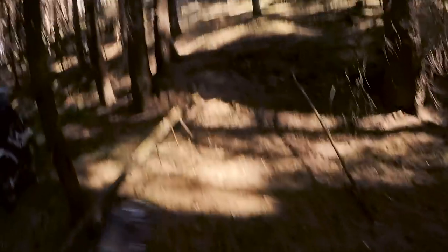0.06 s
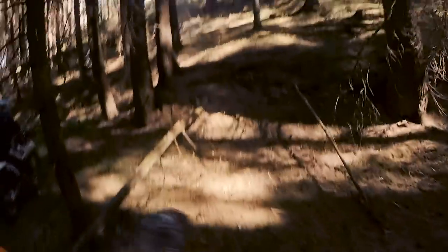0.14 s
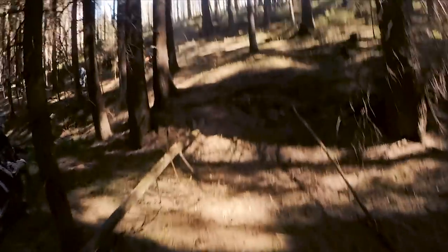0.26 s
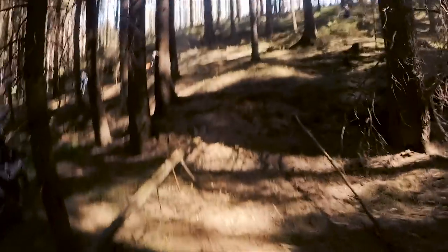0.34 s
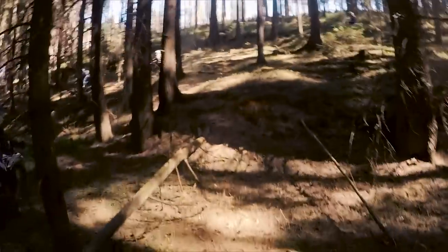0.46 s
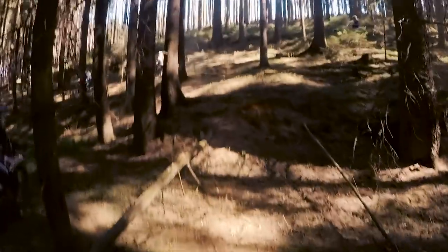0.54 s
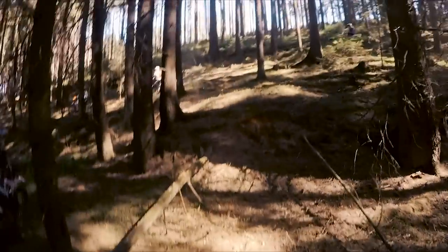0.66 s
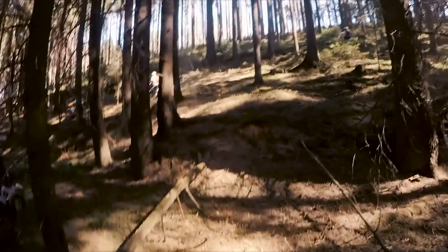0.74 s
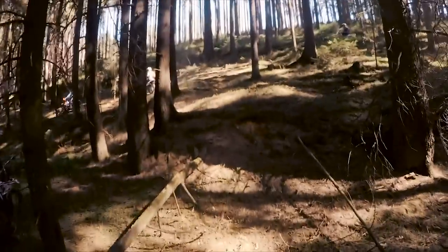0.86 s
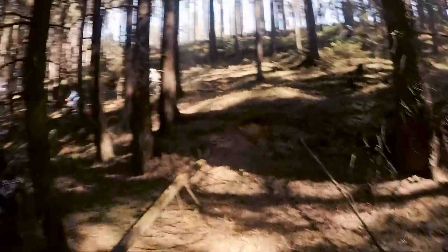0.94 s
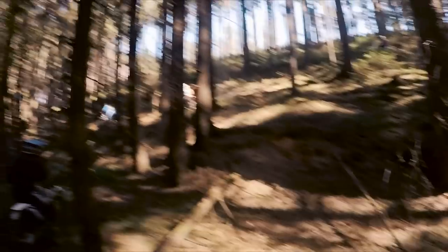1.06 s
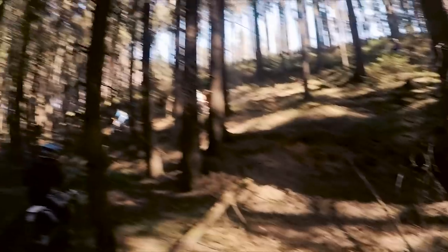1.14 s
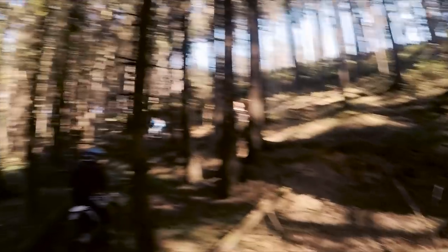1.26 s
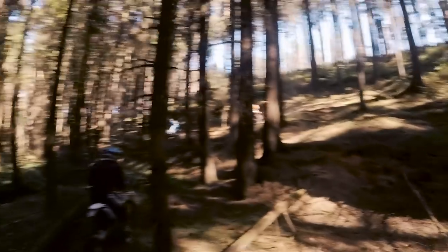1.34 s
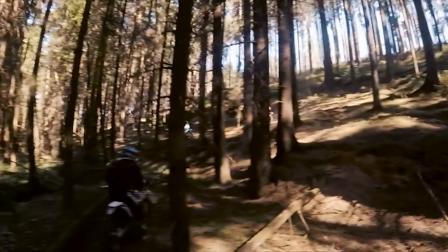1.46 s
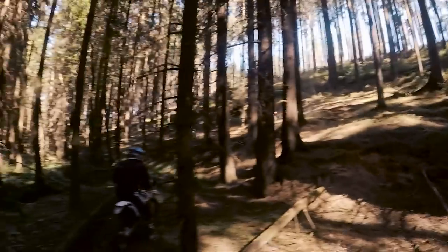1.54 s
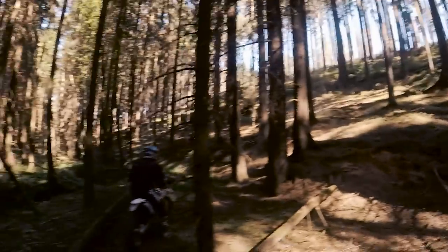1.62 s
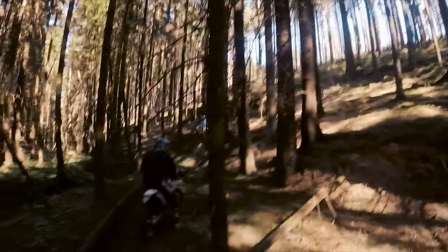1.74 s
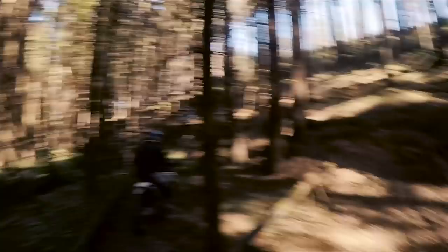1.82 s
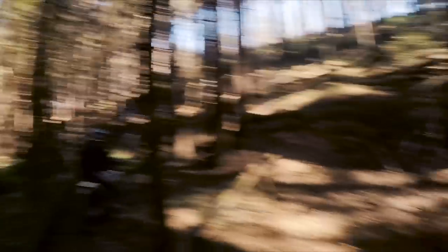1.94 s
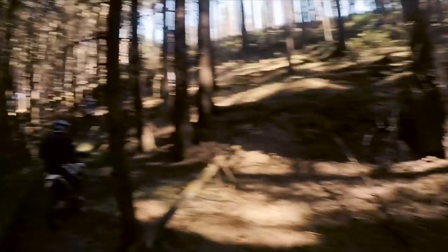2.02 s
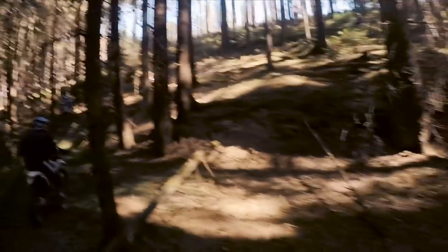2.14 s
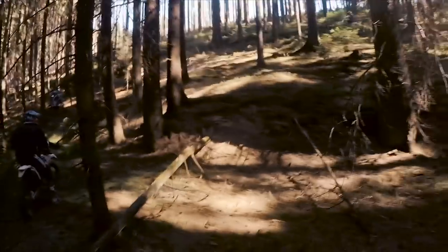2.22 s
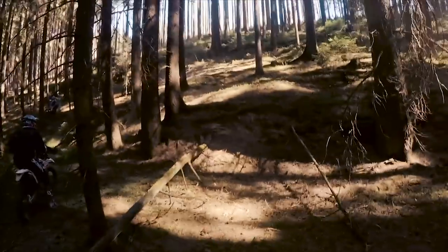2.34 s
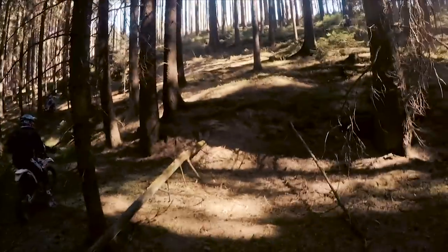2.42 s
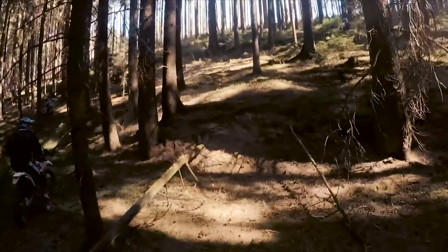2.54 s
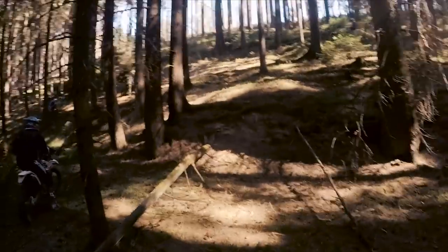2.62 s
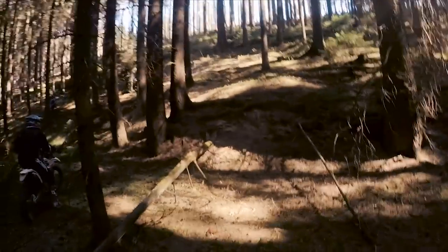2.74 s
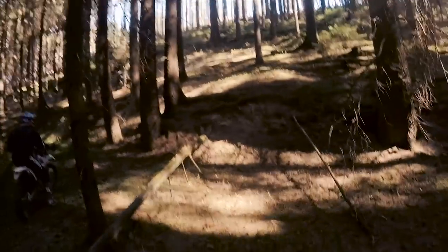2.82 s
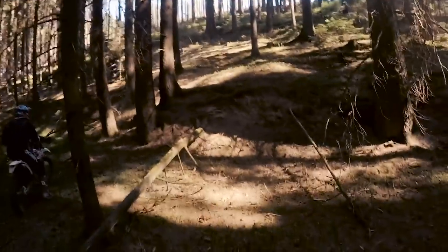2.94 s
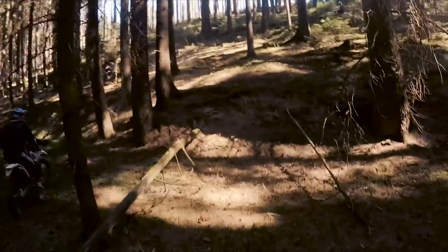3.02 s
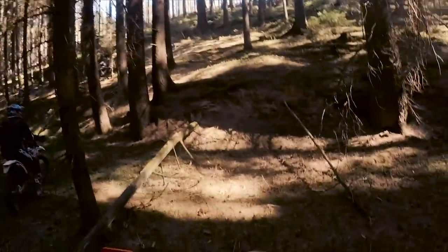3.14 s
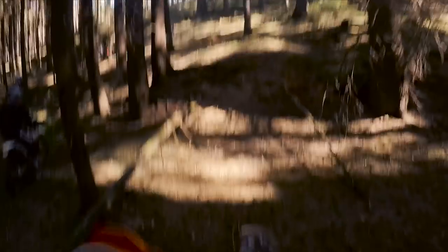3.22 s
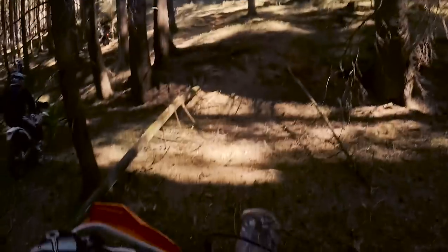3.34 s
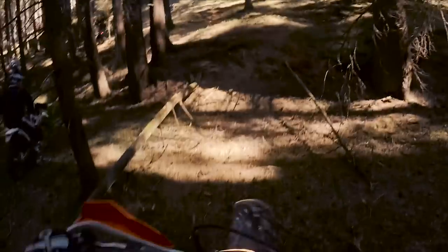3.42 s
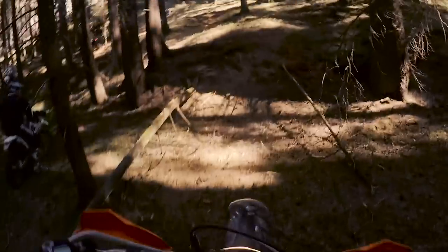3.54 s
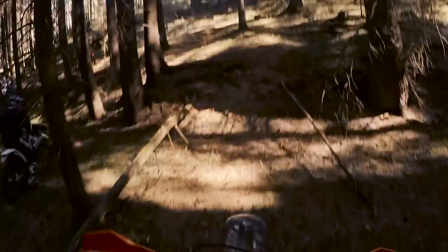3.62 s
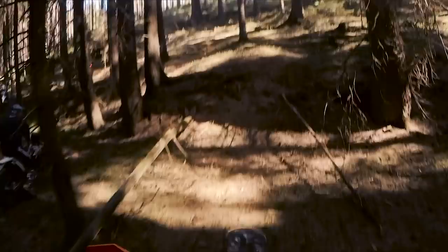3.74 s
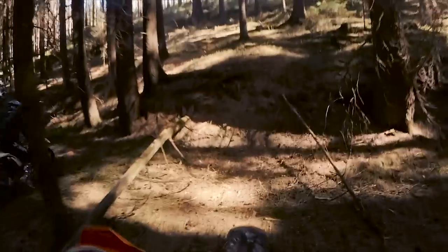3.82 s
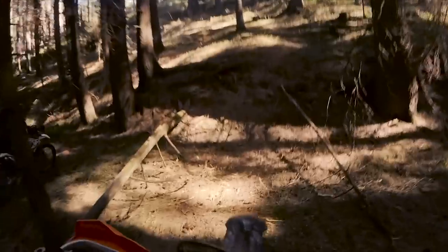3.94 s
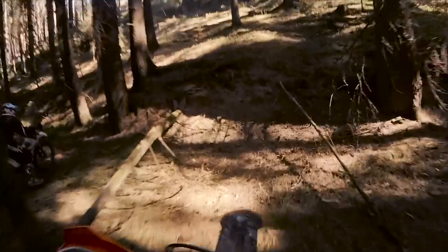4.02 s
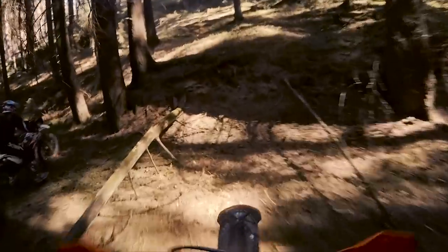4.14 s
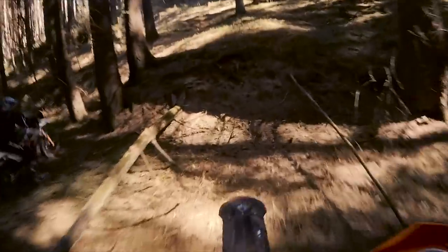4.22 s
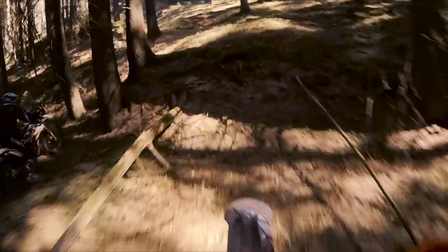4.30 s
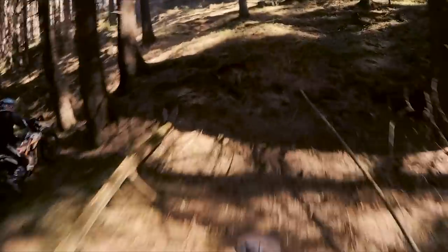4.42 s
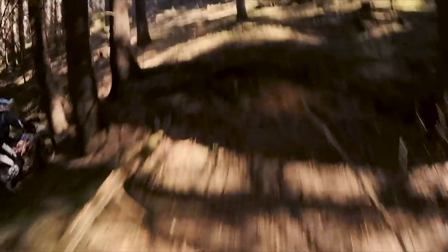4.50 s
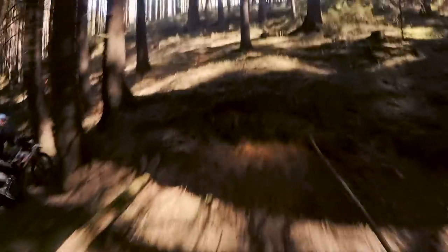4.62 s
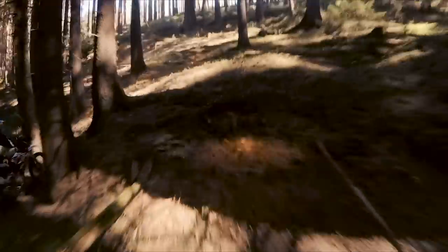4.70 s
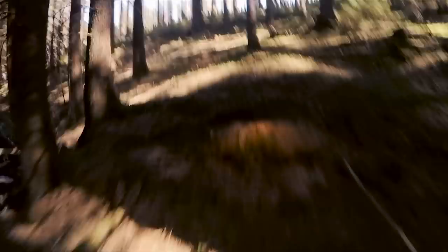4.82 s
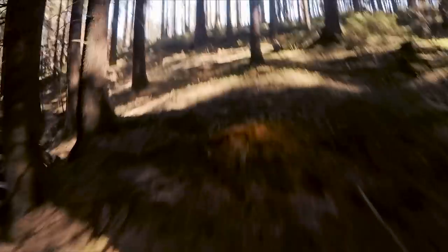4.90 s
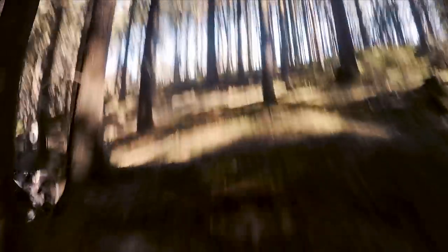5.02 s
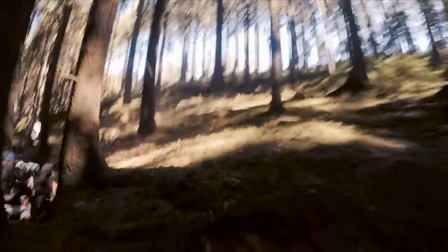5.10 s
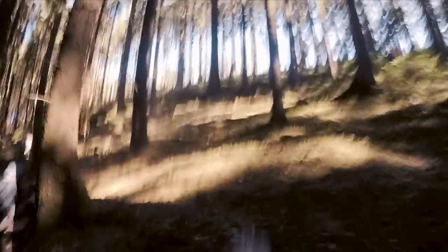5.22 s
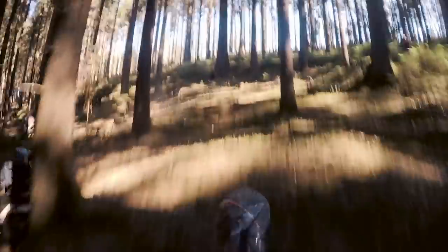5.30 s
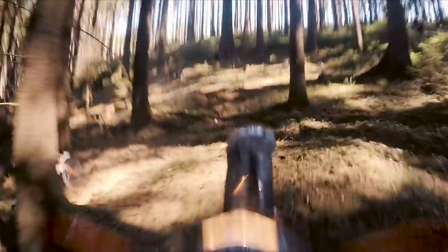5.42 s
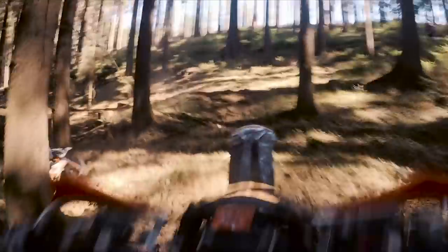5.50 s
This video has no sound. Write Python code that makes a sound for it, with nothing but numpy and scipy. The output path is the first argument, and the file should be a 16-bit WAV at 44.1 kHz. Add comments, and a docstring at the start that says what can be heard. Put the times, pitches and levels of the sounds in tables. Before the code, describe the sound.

Close onboard two-stroke motorbike: falling revs, quiet uneven putter, snarling throttle bursts, a bump, then a high ringing pull through forest.

```python
"""On a forest trail, a two-stroke enduro bike slows to a stumbling idle, is revved in bursts and pulls away.
One crankshaft times the engine: each turn sends a pulse through filters for the exhaust boom and bark,
the airbox and duct honk, the metal clatter and ringing, and a gritty sizzle.
Shaped noise makes the tyres, rattles, gas rushes and low background; the trees return a thin echo."""
import sys
import numpy as np
from scipy import signal
from scipy.fft import rfft, irfft, next_fast_len
from scipy.io import wavfile
from scipy.ndimage import uniform_filter1d

SR = 44100
rng = np.random.default_rng(int(sys.argv[2]) if len(sys.argv) > 2 else 0)


def generate_wav(signal):
    """Clip the signal to [-1, 1] and save it as 16-bit WAV at the path in sys.argv[1]."""
    frames = np.transpose(np.atleast_2d(signal))
    scaled = np.clip(frames, -1, 1) * 32767
    pcm = np.round(scaled).astype(np.int16)
    wavfile.write(sys.argv[1], SR, pcm)


N = 245195   # samples, about 5.6 s
TIME = np.arange(N) / SR   # s


def from_db(db):
    """Decibels to gain."""
    return 10 ** (np.asarray(db) / 20)


def rms_one(x):
    """Scale to an average power of one."""
    return x / np.sqrt(np.mean(x ** 2) + 1e-20)


def steady(x):
    """Hold the power near one, averaged over about a tenth of a second."""
    power = uniform_filter1d(uniform_filter1d(x ** 2, size=2600), size=2000)
    return x / np.sqrt(np.maximum(power, 1e-14))


def noise():
    """White noise: every pitch at once, equally strong."""
    return rng.standard_normal(N)


def band(x, low_hz, high_hz):
    """Keep the pitches between two limits."""
    sections = signal.butter(2, [low_hz, min(high_hz, .45 * SR)], "band", fs=SR, output="sos")
    return signal.sosfilt(sections, x + 1e-18)


def coloured(x, spectrum):
    """Shape the tone to a drawn spectrum, with a filter that never sounds early (minimum phase)."""
    size = next_fast_len(N + SR // 4) * 2
    hz, db = np.transpose(spectrum)
    grid_hz = np.maximum(np.arange(size // 2 + 1) * SR / size, 1)
    gain = from_db(np.interp(np.log(grid_hz), np.log(hz), db))
    # folding the cepstrum forward in time gives the minimum phase
    cepstrum = irfft(np.log(gain))
    cepstrum[1:size // 2] *= 2
    cepstrum[size // 2 + 1:] = 0
    return irfft(rfft(x, size) * np.exp(rfft(cepstrum)))[:N]


def resonate(x, modes):
    """Ring several resonances side by side, each with its own pitch, width and level."""
    out = 0
    for hz, width_hz, db in modes:
        r = np.exp(-np.pi * width_hz / SR)
        poles = [1, -2 * r * np.cos(2 * np.pi * hz / SR), r * r]
        ringing = signal.lfilter([1, 0, -1], poles, x + 1e-18)
        out = out + from_db(db) * (1 - r * r) / 2 * ringing
    return out


def impulses(times, sizes):
    """Clicks shared between the two nearest samples, so they can fall in between."""
    out, at = np.zeros(N + 2), np.clip(np.asarray(times) * SR, 0, N)
    np.add.at(out, at.astype(int), sizes * (1 - at % 1))
    np.add.at(out, at.astype(int) + 1, sizes * (at % 1))
    return out[:N]


def dying(clicks, decay_s):
    """Each click starts an exponential fade of its own height."""
    return signal.lfilter([1], [1, -np.exp(-1 / (decay_s * SR))], clicks + 1e-18)


def puffs(pulses, decay_s, between):
    """Rushing gas or grit: noise that flares with each pulse and lingers between them."""
    return steady(noise() * (steady(dying(pulses, decay_s)) + between))


def gate(start_s, end_s, attack_s, release_s):
    """Rises from the start, holds at one, falls after the end."""
    return np.clip((TIME - start_s) / attack_s, 0, 1) * np.clip(1 - (TIME - end_s) / release_s, 0, 1)


def spells(rows, attack_s, release_s):
    """Gain that rises to each row's level from its start to its end."""
    return sum(from_db(db) * gate(start, end, attack_s, release_s) for start, end, db in rows)


# low background, tone curve: pitch_hz, level_db
BACKGROUND_TONE = [(13, -18), (22, 0), (107, -1.5), (195, -14), (347, -6.5), (431, -11.5), (615, -10),
                   (830, -15), (1430, -20), (4390, -32), (15000, -37)]


def background():
    """Steady noise with most of its strength in the lowest pitches."""
    return from_db(-50) * rms_one(coloured(noise(), BACKGROUND_TONE))


def forest(x):
    """Tree trunks scatter a thin, dull tail of echoes."""
    t60_s, wet_db = .3, -19   # time to fade by 60 dB; level before the tone filter
    t = TIME[:SR // 2]
    sparse = rng.standard_normal(len(t)) * (rng.random(len(t)) < .03)
    echoes = sparse * from_db(-60 * t / t60_s) * (t > .012)
    tail = signal.fftconvolve(x, echoes / np.sqrt(np.sum(echoes ** 2)))[:N]
    return from_db(wet_db) * band(tail, 500, 5000)


def rustle(start_s, end_s, level_db):
    """A soft, high rustle swells just before the throttle opens, then stops."""
    swell = np.clip((TIME - start_s) / (end_s - start_s), 0, None) ** .5 * (TIME < end_s)
    return from_db(level_db) * swell * rms_one(band(noise(), 2100, 8200))


# wheels over roots and dry litter: start_s, end_s, thud_db, crunch_db
BUMPS = [(0.857, 0.98, -38, -53), (2.068, 2.298, -49.5, -55.5), (2.327, 2.613, -57, -62.5),
         (4.25, 4.503, -27.5, -36)]


def tyres():
    """Low noise thuds and sparse noise grains crunch as the wheels roll over the forest floor."""
    spans = np.array([gate(start, end, attack_s=0.035, release_s=0.054) for start, end, *_ in BUMPS])
    thud, crunch = from_db(np.transpose(BUMPS)[2:]) @ spans
    grains = noise() * (rng.random(N) < 2500 / SR)   # about 2500 a second
    thud_noise = rms_one(band(noise(), low_hz=65, high_hz=255))
    return thud * thud_noise + crunch * rms_one(band(grains, low_hz=1090, high_hz=2420))


# loose parts on the chassis: start_s, level_db (before trim and filter)
RATTLES = [(0.2944, -40), (0.9068, -40), (3.282, -23.5), (3.3217, -22.5), (3.3335, -41), (3.3776, -28),
           (4.334, -32.5)]
# small clicks of the controls: start_s, level_db (before boost and ringing)
CLICKS = [(1.947, -40)]
# ringing of a click: pitch_hz, width_hz, level_db
CLICK_RINGING = [(2300, 200, 4), (2740, 190, 10), (4900, 380, 1), (5530, 370, -19)]


def rattles():
    """Loose parts buzz in short noise bursts; a lever's click rings briefly."""
    s, db = np.transpose(RATTLES)
    buzz = band(noise(), 1900, 17000) * dying(impulses(s, from_db(db - 1.5)), decay_s=0.01)
    s, db = np.transpose(CLICKS)
    burst = noise() * dying(impulses(s, from_db(db + 8)), decay_s=.002)
    return buzz + resonate(burst, CLICK_RINGING)


def frame_rumble(speed):
    """The frame shakes harder with engine speed, heard as low noise."""
    return from_db(-42) * speed / speed.max() * rms_one(band(noise(), 24, 140))


# crankshaft speed: time_s, speed_turns_per_s
CRANK_SPEED = [(0.0, 89.2), (0.15, 79.2), (0.39, 64.7), (0.6, 56.0), (0.8, 51.0), (1.1, 43.2), (1.55, 31.6),
               (2.85, 30.1), (2.97, 48.2), (3.02, 53.0), (3.15, 79.0), (3.2, 91.2), (3.26, 103.8),
               (3.32, 107.0), (3.474, 74.6), (3.53, 77.0), (3.67, 92.2), (3.782, 98.5), (3.89, 91.8),
               (3.97, 97.2), (4.068, 105.5), (4.21, 105.3), (4.3, 80.2), (4.4, 51.5), (4.47, 55.8),
               (4.53, 70.2), (4.58, 76.8), (4.645, 81.0), (4.696, 99.2), (4.74, 108.2), (4.8, 117.8),
               (4.85, 131.2), (4.905, 138.6), (4.96, 121.2), (5.09, 129.0), (5.14, 124.0), (5.2, 124.0),
               (5.32, 103.9), (5.45, 96.2), (5.56, 89.9)]
# twists of the throttle: start_s, end_s, twist_s, added_opening (0-1), added_unevenness (0-1, sign ignored
# after summing), exhaust_bark_db, duct_honk_db
BLIPS = [(2.93, 3.3, 0.16, 0.2, 0.09, 1.5, -3.5), (3.446, 3.77, 0.016, 0.22, 0.12, 0, 1.5),
         (3.783, 4.194, 0.32, 0.36, 0.04, -1, -0.5), (4.364, 4.89, 0.036, 0.39, 0.01, 1.5, -1)]
# clutch engaged: start_s, end_s
IN_GEAR = [(-.5, 1.117), (4.781, 6.0)]
# engine runs free and stumbles: start_s, end_s
STUMBLES = [(1.1, 2.94), (3.3, 3.45), (3.785, 3.875), (4.215, 4.365)]
KNEE_SPEED = 96.15   # turns per s; above it loudness follows a second slope


def riding():
    """The rider's controls and what they do to the engine: speed, load, tone and how evenly it fires."""
    speed = np.interp(TIME, *np.transpose(CRANK_SPEED))
    held = gate(2.86, 5.24, attack_s=.19, release_s=.075)   # throttle held part open
    twists = np.array([gate(start, end, twist_s, release_s=0.046) for start, end, twist_s, *_ in BLIPS])
    more, rough, bark_db, duct_db = np.transpose(BLIPS)[3:] @ twists
    in_gear = sum(gate(start, end, attack_s=0.16, release_s=0.03) for start, end in IN_GEAR)
    free = sum(gate(start, end, attack_s=.02, release_s=.025) for start, end in STUMBLES)
    return dict(
        speed=speed,
        doublings=np.log2(speed / KNEE_SPEED),
        throttle=.46 * held + more,
        in_gear=in_gear,
        # always a little uneven, more with the throttle shut, most while running free
        uneven=.05 + np.abs(rough) + .13 * (1 - held) + .42 * free,
        skip=.3 * free * held,   # weakening of every second firing (0-1)
        bark_db=bark_db,
        duct_db=duct_db - 1.5 * free)


def surge():
    """A slow random swing of spread one, between 3 and 14 Hz."""
    step = 100   # samples between slow values
    sections = signal.butter(2, [3, 14], "band", fs=SR / step, output="sos")
    slow = rms_one(signal.sosfilt(sections, rng.standard_normal(N // step + 2)))
    return np.interp(np.arange(N) / step, np.arange(len(slow)), slow)


def loudness(law, ride):
    """Gain of one engine part from speed, throttle and clutch; it surges more when firing is uneven."""
    knee_db, speed_db, above_db, throttle_db, gear_db = law
    speed_part = speed_db * ride["doublings"] + above_db * np.maximum(ride["doublings"], 0)
    load_part = throttle_db * ride["throttle"] + gear_db * ride["in_gear"]
    return from_db(knee_db + speed_part + load_part + 4.5 * ride["uneven"] * surge())


def firings(ride, jitter_s, spread_db, lag_turns=0):
    """One pulse a turn; uneven running varies strength and timing, and every second one may weaken."""
    turns = np.cumsum(ride["speed"]) / SR
    number = np.arange(int(turns[-1]) + 1)
    times = np.interp(number + lag_turns, turns, TIME)
    uneven = np.interp(times, TIME, ride["uneven"])
    skip = np.interp(times, TIME, ride["skip"])
    late, strong = np.clip(rng.standard_normal((len(times), 2)), -2, 2).T
    sizes = from_db(spread_db * uneven * strong) * (1 - skip * (number % 2))
    return impulses(times + jitter_s * uneven * late, sizes)


# round trips in the exhaust's expansion chamber: trip_s
PIPE_TRIPS = [.0011, .0019, .0031]


def scattered(x):
    """Reflections along the pipe smear each pulse and leave its spectrum whole."""
    for trip_s in PIPE_TRIPS:
        loop = np.r_[1, np.zeros(int(trip_s * SR) - 1), -.55]
        x = signal.lfilter(loop[::-1], loop, x)
    return x


# echoes off the ground and nearest trunks: delay_s, delay_change_s_per_s, level_db
NEAR_ECHOES = [(.0052, .00012, -7), (.0127, -.00025, -9), (.0209, .0003, -11)]


def bounced(x):
    """Near echoes shift as the rider moves, so overtones swell and fade in turn."""
    out = x
    for delay_s, change, db in NEAR_ECHOES:
        out = out + from_db(db) * np.interp(TIME - delay_s - change * TIME, TIME, x)
    return out


# whines and low drones: start_s, end_s, cycles_per_turn, level_db
WHINES = [(-.2, .25, 4, -30), (-.04, .26, 8, -27), (-.1, .14, 7, -33), (.16, .46, 7, -31),
          (.3, .42, 9, -38), (-.02, .22, 16, -31), (-.1, .2, 19, -37), (.33, .66, 2, -34.5),
          (.6, 1.2, 2, -39), (.18, .36, 13, -37), (.22, .32, 18, -35), (.26, .4, 15, -39),
          (.14, .26, 9, -33), (.36, 1.18, 7, -36.5), (.3, 1.18, 6, -38), (.7, 1.0, 4, -41),
          (.45, .8, 9, -41), (.5, .8, 12, -37), (.75, 1.13, 11, -41), (.88, 1.1, 13, -40),
          (1.2, 2.0, 4, -51), (5.2, 5.5, 2, -21), (5.3, 5.65, 5, -28), (5.33, 5.49, 13, -25),
          (5.3, 5.42, 15, -33), (5.45, 5.7, 11, -28)]


def whines_and_drones(speed):
    """Whines and low drones hum at whole multiples of the crank speed, swelling and fading."""
    angle = 2 * np.pi * np.cumsum(speed) / SR
    hum = 0
    for start, end, multiple, db in WHINES:
        swell = np.sin(np.pi * np.clip((TIME - start) / (end - start), 0, 1))
        hum = hum + from_db(db) * swell * np.sin(round(multiple) * angle)
    waver = 1 + .35 * rms_one(band(noise(), 8, 90))
    return waver * hum


def knock(strokes):
    """As the engine runs down in gear, one sharp piston knock a turn stands out."""
    sharp = steady(band(strokes, low_hz=260, high_hz=1300))
    return from_db(-41.5) * gate(.42, .92, attack_s=.08, release_s=.12) * sharp


# how loud the case and cylinder ring: at_knee_db, per_speed_doubling_db, extra_per_doubling_above_knee_db,
# full_throttle_db, in_gear_db
CASE_LOUDNESS = (-50, 32, -63, 1, 4)
CYLINDER_LOUDNESS = (-57.5, 11, 5, 5.5, 2.5)
# spells when the cylinder rings louder: start_s, end_s, extra_db
CYLINDER_SINGS = [(1.28, 1.87, 4), (4.74, 4.95, 5), (4.95, 5.22, 9)]


def metal(strokes, ride):
    """Each piston slap rings the case and the cylinder, ticking at idle and singing at speed."""
    slaps = steady(strokes) + .25 * puffs(strokes, decay_s=0.0059, between=0.22)
    swell = from_db(14 * gate(4.0, 4.21, attack_s=0.095, release_s=0.053))   # the case sings for a spell
    case = swell * steady(resonate(slaps, [(4740, 60, -7), (4850, 60, -8), (5060, 60, 0)]))
    sing_db = sum(db * gate(start, end, attack_s=.08, release_s=.08) for start, end, db in CYLINDER_SINGS)
    cylinder = from_db(sing_db) * steady(resonate(slaps, [(3226, 35, 0)]))
    return loudness(CASE_LOUDNESS, ride) * case + loudness(CYLINDER_LOUDNESS, ride) * cylinder


# ringing of the cases: pitch_hz, width_hz, level_db
CASE_RINGING = [(1760, 200, -5.5), (2647, 42, 4.5), (4770, 240, -27)]
# tone curves of clatter and sizzle: pitch_hz, level_db
CLATTER_TONE = [(300, -65), (850, 10), (1300, 12), (1800, 7), (2300, 5), (3000, 3.5), (4000, -1),
                (4600, -13), (5300, -6), (7000, -9), (15000, -18)]
SIZZLE_TONE = [(2940, -39), (5000, -3), (6900, -9), (7640, -4), (8170, -8), (8870, -2), (11700, -5.5),
               (14100, -2.5), (15800, -4)]
# how loud they are: at_knee_db, per_speed_doubling_db, extra_per_doubling_above_knee_db,
# full_throttle_db, in_gear_db
CLATTER_LOUDNESS = (-38, 18.5, -34.5, 14.5, 8.5)
SIZZLE_LOUDNESS = (-46, 12.5, -3, 13, 5)
# spells when the block's levels shift: start_s, end_s, clatter_db, sizzle_db
FLARES = [(-.1, 0.166, 2.5, -11), (0.983, 1.093, 5, 1), (2.93, 2.99, 4, 1.5), (3.178, 3.35, 4, -2),
          (4.027, 4.203, 1.5, 2.5), (4.188, 4.243, 2.5, 1.5), (4.687, 4.77, 5.5, 4.5)]


def block(pulses, ride):
    """Piston and gears clatter once a turn and ring the cases; above them lies a gritty sizzle."""
    flares = np.array([gate(start, end, attack_s=0.027, release_s=0.064) for start, end, *_ in FLARES])
    clatter_db, sizzle_db = np.transpose(FLARES)[2:] @ flares
    # the clean blows gain on the noise under load
    regular = .55 + .5 * ride["throttle"] + .35 * ride["in_gear"]
    blows = regular * steady(bounced(scattered(pulses))) + puffs(pulses, decay_s=.005, between=1.1)
    ringing_blows = blows + from_db(-6.5) * resonate(blows, CASE_RINGING)
    clatter = from_db(clatter_db) * steady(coloured(ringing_blows, CLATTER_TONE))
    grit = puffs(pulses, decay_s=.005, between=2.2)
    sizzle = from_db(sizzle_db) * steady(coloured(grit, SIZZLE_TONE))
    return loudness(CLATTER_LOUDNESS, ride) * clatter + loudness(SIZZLE_LOUDNESS, ride) * sizzle


# spells when the pipe's shell sings: start_s, end_s, level_db
SHELL_SINGS = [(3.2, 3.3, -35), (3.55, 3.79, -38), (3.93, 4.04, -36), (4.04, 4.205, -29), (4.81, 4.92, -36),
               (4.95, 5.21, -32.5)]
# ringing of the shell: pitch_hz, width_hz, level_db
SHELL_RINGING = [(1150, 70, -7), (1260, 90, 0), (1375, 90, -4), (1680, 120, -15)]


def shell(strokes):
    """Under load the pipe's shell rings, lifting each overtone that glides through its resonances."""
    ringing = resonate(bounced(scattered(strokes)), SHELL_RINGING)
    gain = spells(SHELL_SINGS, attack_s=.04, release_s=.035)
    return gain * steady(band(ringing, low_hz=450, high_hz=2000))


def gliding(strokes, rows, width_hz):
    """Each turn rings a narrow resonance whose pitch and level glide over the row's span."""
    out, r = 0, np.exp(-np.pi * width_hz / SR)
    for start, end, first_db, last_db, first_hz, last_hz in rows:
        near = (TIME > start - .1) & (TIME < end + .1)
        pitch_hz = np.interp(TIME[near], [start, end], [first_hz, last_hz])
        # shift the moving pitch down to zero, ring there, shift back up
        carrier = np.exp(2j * np.pi * np.cumsum(pitch_hz) / SR)
        slow = signal.lfilter([1], [1, -2 * r, r * r], strokes[near] / carrier + 1e-18)
        ringing = np.zeros(N)
        ringing[near] = steady((slow * carrier).real)
        level = from_db(np.interp(TIME, [start, end], [first_db, last_db]))
        out = out + level * gate(start, end, attack_s=0.024, release_s=0.026) * ringing
    return out


# narrow airbox growls as the throttle opens, holds or closes, then pipe resonances that glide with the
# gas heat: start_s, end_s, first_db, last_db, first_hz, last_hz
GROWLS = [(2.94, 3.0, -34, -28, 238, 252), (3.0, 3.1, -24.5, -19.5, 255, 305),
          (3.22, 3.325, -24, -20, 210, 210), (3.45, 3.5, -21, -20, 255, 285),
          (3.78, 3.88, -25, -25, 235, 235), (4.19, 4.25, -24, -25, 285, 270)]
PIPE_SINGS = [(3.1, 3.21, -35, -27, 530, 640), (3.21, 3.3, -23, -23, 640, 620),
              (3.52, 3.79, -26, -30, 600, 810), (4.03, 4.195, -28, -24, 630, 630),
              (4.05, 4.21, -35, -32, 1160, 1160), (4.67, 4.8, -30, -36, 1750, 2000),
              (4.73, 4.8, -25, -27, 1180, 1300), (4.8, 5.22, -36, -34, 750, 730),
              (4.97, 5.2, -39, -38, 1720, 2080)]


def singing(strokes):
    """The airbox growls and the pipe sings, both picking out the engine's overtones."""
    return gliding(strokes, GROWLS, width_hz=95) + gliding(scattered(strokes), PIPE_SINGS, width_hz=150)


# spells of uneven idle putter, then of gas rushing through the pipe: start_s, end_s, level_db
PUTTER = [(1.1, 2.9, -54)]
RUSHES = [(2.925, 2.99, -39), (3.275, 3.335, -21.5), (3.785, 3.88, -28.5), (4.21, 4.24, -34)]
# ringing of the putter: pitch_hz, width_hz, level_db
PUTTER_RINGING = [(107, 49, 1), (255, 79, 3.5), (363, 90, -1)]
# tone curve of the rush: pitch_hz, level_db
RUSH_TONE = [(50, -15), (100, -15.5), (200, -12), (320, -9), (450, -18), (620, 0), (800, -10.5),
             (1300, -17), (2500, -41.5), (8000, -40)]


def misfires(ride):
    """Weak, uneven firings putter at idle; misfires blow a rush of gas through the pipe."""
    weak = firings(ride, jitter_s=.003, spread_db=9)
    putter = band(resonate(weak, PUTTER_RINGING), low_hz=70, high_hz=450)
    start, end, _ = PUTTER[0]
    putter = putter / np.std(putter[(TIME > start) & (TIME < end)])
    rush = steady(coloured(noise(), RUSH_TONE))
    return (spells(PUTTER, attack_s=.05, release_s=0.066) * putter
            + spells(RUSHES, attack_s=0.0066, release_s=0.03) * rush)


# lone firings: start_s, thump_db and spit_db (before boost and filters), ring_hz, overtone_db
POPS = [(1.273, -40, -64, 265, -5), (1.553, -33, -57, 265, 0), (1.801, -39, -54, 265, -5),
        (2.106, -24, -53, 220, -11), (2.296, -29.5, -54, 200, 1), (2.483, -24, -55, 250, -11),
        (2.586, -25.5, -52.5, 253, -4), (2.873, -19.5, -82, 245, -20), (2.907, -12, -73, 246, -27),
        (3.451, 4, -41.5, 258, -11), (4.334, -0.5, -50, 255, -14), (4.389, 4, -42, 284, -10)]


def pops():
    """A lone firing thumps in the airbox and spits briefly."""
    thumps = 0
    for s, thump_db, _, ring_hz, overtone_db in POPS:
        blast = band(impulses([s], from_db([thump_db])), 40, 630)
        thumps = thumps + from_db(32) * resonate(blast, [(ring_hz, 55, 0), (470, 160, overtone_db)])
    s, _, spit_db, *_ = np.transpose(POPS)
    spit = band(noise(), 1500, 15000) * dying(impulses(s, from_db(spit_db + 8)), decay_s=.007)
    return thumps + spit


# inlet resonances that delay overtones: pitch_hz, width_hz
INLET_LAGS = [(340, 150), (470, 110)]


def dispersed(x):
    """The inlet tract delays overtones near its resonances, so the gulps fuse."""
    for hz, width_hz in INLET_LAGS:
        r = np.exp(-np.pi * width_hz / SR)
        poles = [1, -2 * r * np.cos(2 * np.pi * hz / SR), r * r]
        x = signal.lfilter(poles[::-1], poles, x)   # all-pass: shifts time, keeps level
    return x


# tone curve of the roar: pitch_hz, level_db
ROAR_TONE = [(55, -46), (90, -29), (140, -13), (220, 1), (300, 5.5), (370, -0.5), (450, 0), (540, -3),
             (620, -8.5), (760, -26), (1500, -46.5)]
# how loud it is: at_knee_db, per_speed_doubling_db, extra_per_doubling_above_knee_db,
# full_throttle_db, in_gear_db
ROAR_LOUDNESS = (-7, 5.5, -7.5, 2.5, -13)


def roar(gulps, ride):
    """Wide open, the intake roars; at low revs a second gulp each turn lifts the even harmonics."""
    second = steady(firings(ride, jitter_s=.001, spread_db=10, lag_turns=.515))
    fade_from, fade_to = 78, 93   # turns per s
    lugging = np.clip((fade_to - ride["speed"]) / (fade_to - fade_from), 0, 1)
    both_gulps = gulps + .72 * lugging * second
    return loudness(ROAR_LOUDNESS, ride) * steady(coloured(both_gulps, ROAR_TONE))


# tone curves of airbox and duct: pitch_hz, level_db
AIRBOX_TONE = [(50, -35), (110, -13), (155, 3.5), (210, 10.5), (280, 9), (330, 12.5), (420, -4.5),
               (600, -64), (1500, -55)]
DUCT_TONE = [(100, -29.5), (280, -9.5), (390, 7.5), (450, 15.5), (540, 10), (630, 19), (720, -31.5),
             (850, -32.5), (2000, -49.5)]
# how loud they are: at_knee_db, per_speed_doubling_db, extra_per_doubling_above_knee_db,
# full_throttle_db, in_gear_db
AIRBOX_LOUDNESS = (-36.5, 16, -27, 28, 6.5)
DUCT_LOUDNESS = (-41.5, 10.5, -24, 27.5, 11.5)


def intake(pulses, ride):
    """Each gulp of air rings the airbox and honks in the duct; wide open, both give way to a roar."""
    turbulence = .06 + .9 * ride["uneven"] + 2.5 * ride["uneven"] ** 2
    gulps = steady(pulses) + turbulence * puffs(pulses, decay_s=0.078, between=0.94)
    airbox = loudness(AIRBOX_LOUDNESS, ride) * steady(coloured(gulps, AIRBOX_TONE))
    honk = steady(bounced(coloured(scattered(gulps), DUCT_TONE)))
    duct = loudness(DUCT_LOUDNESS, ride) * from_db(ride["duct_db"]) * honk
    wide_from, wide_full = .78, .92   # throttle openings between which the roar takes over
    wide = np.clip((ride["throttle"] - wide_from) / (wide_full - wide_from), 0, 1)
    return (1 - wide) * dispersed(duct - airbox) + wide * roar(gulps, ride)


# silencer resonances: pitch_hz, width_hz, level_db
SILENCER_RINGING = [(597, 50, 3.5), (1220, 890, 5.5)]
# tone curve of the bark: pitch_hz, level_db
BARK_TONE = [(60, -30), (200, -20), (450, -12), (580, -1), (680, 0), (780, -2), (900, -5), (1100, -5),
             (1400, -8), (1750, -9), (2200, -15), (4000, -24), (8000, -40)]
# how loud boom and bark are: at_knee_db, per_speed_doubling_db, extra_per_doubling_above_knee_db,
# full_throttle_db, in_gear_db
BOOM_LOUDNESS = (-30, 16, -33, 10.5, 2.5)
BARK_LOUDNESS = (-31, 16.5, -38, 11, 7)


def exhaust(pulses, ride):
    """Bursts of exhaust pressure and their gas noise boom in the pipe and bark out of the silencer."""
    turbulence = .12 + 1.2 * ride["uneven"] + 2.5 * ride["uneven"] ** 2
    gas = turbulence * puffs(pulses, decay_s=0.1, between=1.0)
    # the boom weakens while the pipe's resonance falls between two harmonics
    gap_speed, gap_width, gap_db = 71, 0.27, -4   # turns per s, doublings, dB
    distance = np.log2(ride["speed"] / gap_speed) / gap_width
    off_resonance = from_db(gap_db * np.exp(-distance ** 2))
    boom = off_resonance * steady(band(band(steady(pulses) + .5 * gas, 83.5, 138.0), 36, 118))
    flow = steady(scattered(pulses)) + gas
    silenced = flow + from_db(-2.5) * resonate(flow, SILENCER_RINGING)
    bark = from_db(ride["bark_db"]) * steady(bounced(coloured(silenced, BARK_TONE)))
    return loudness(BOOM_LOUDNESS, ride) * boom + loudness(BARK_LOUDNESS, ride) * bark


def scene():
    """The bike among the trees, over a low background; both ears hear the same."""
    ride = riding()
    speed = ride["speed"]
    pulses = firings(ride, jitter_s=.0005, spread_db=6.0)
    strokes = firings(ride, jitter_s=.0001, spread_db=3.0)   # more regular, for the clean ringing
    engine = whines_and_drones(speed) + knock(strokes) + metal(strokes, ride) + block(pulses, ride)
    engine = engine + shell(strokes) + singing(strokes) + misfires(ride) + pops()
    engine = engine + intake(pulses, ride) + exhaust(pulses, ride)
    surroundings = background() + forest(engine) + rustle(start_s=2.51, end_s=2.82, level_db=-57.5)
    mono = surroundings + tyres() + rattles() + frame_rumble(speed) + engine
    return np.array([mono, mono])


def record(dry):
    """The loudest peaks are clipped flat; then a steep filter cuts the top of the treble."""
    clipped = np.clip(dry, -.72, .72)
    low_pass = signal.ellip(12, .1, 80, 15850, fs=SR, output="sos")   # cut at 15850 Hz
    return signal.sosfilt(low_pass, clipped)


dry = scene()
out = record(dry)
generate_wav(out)
```